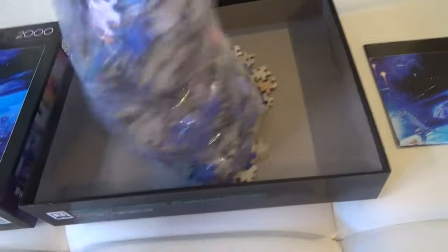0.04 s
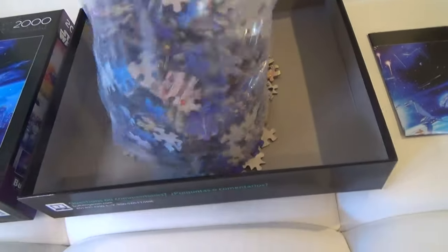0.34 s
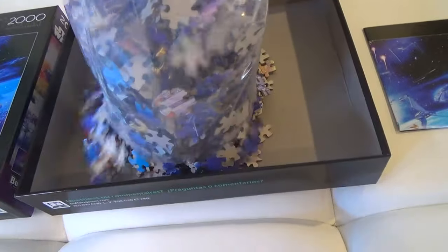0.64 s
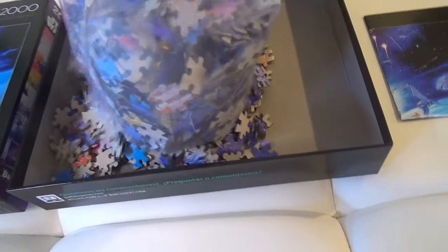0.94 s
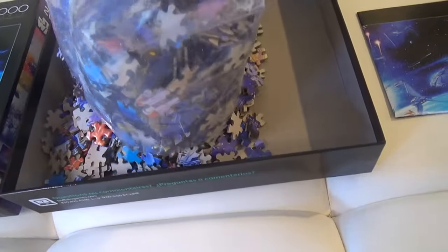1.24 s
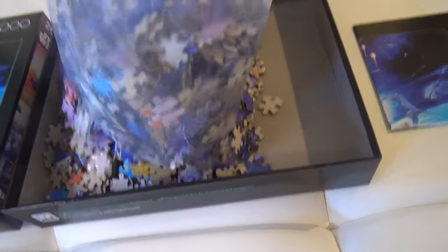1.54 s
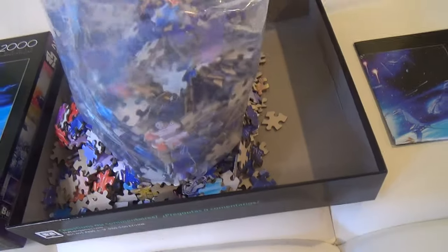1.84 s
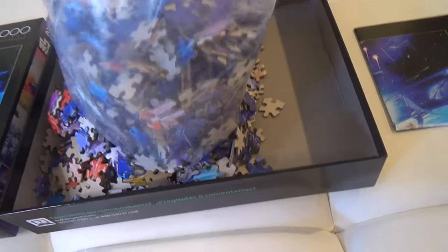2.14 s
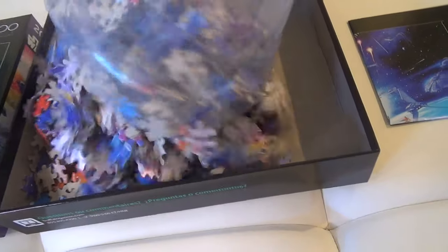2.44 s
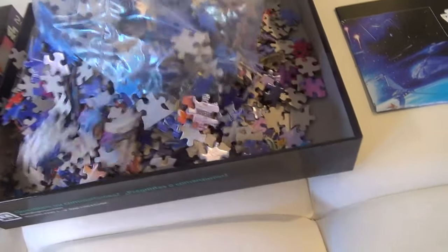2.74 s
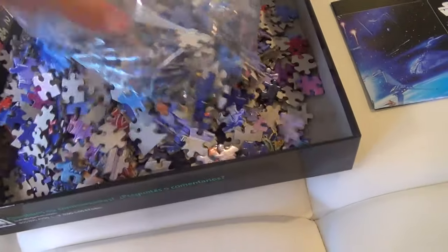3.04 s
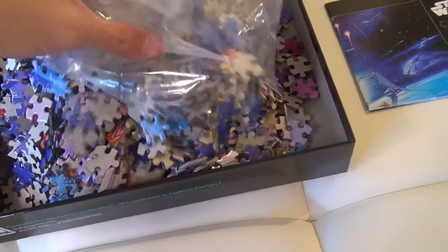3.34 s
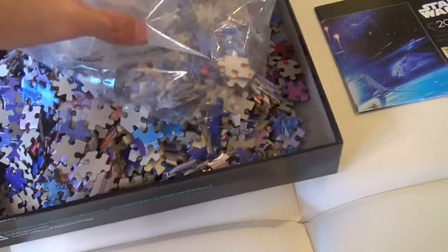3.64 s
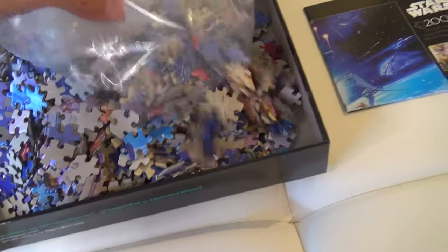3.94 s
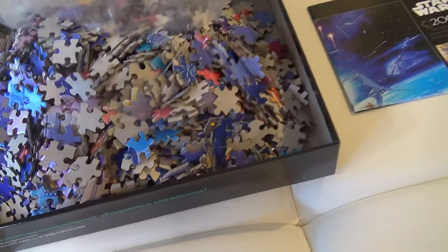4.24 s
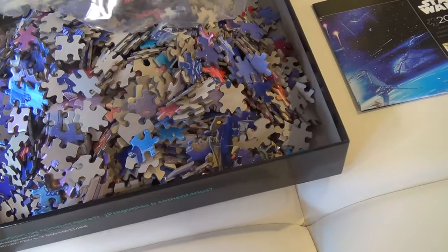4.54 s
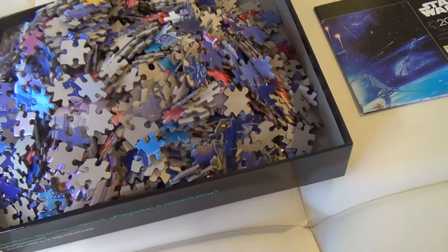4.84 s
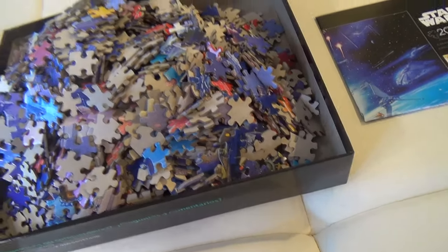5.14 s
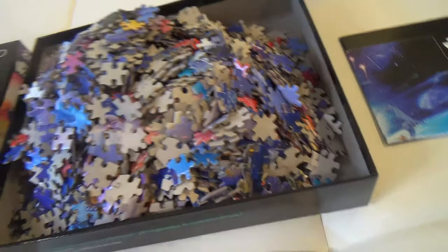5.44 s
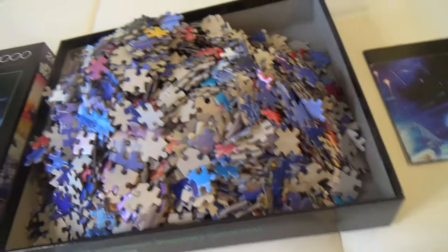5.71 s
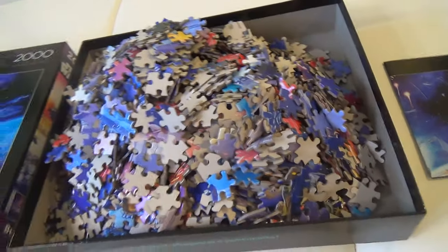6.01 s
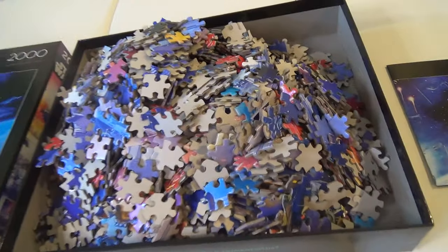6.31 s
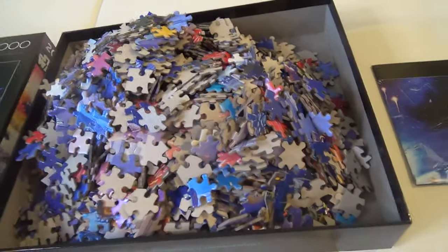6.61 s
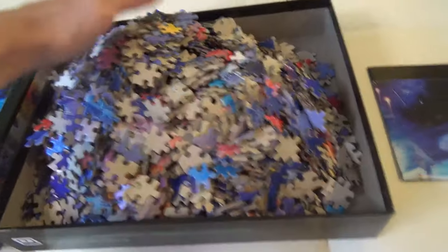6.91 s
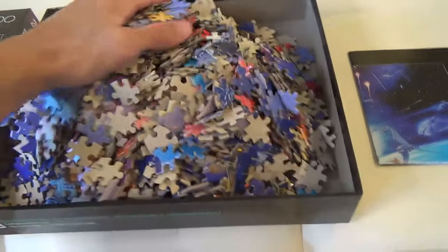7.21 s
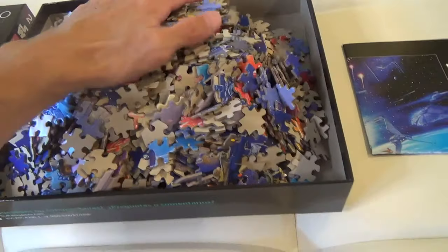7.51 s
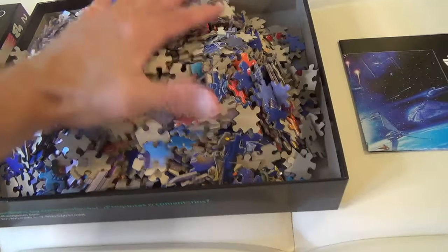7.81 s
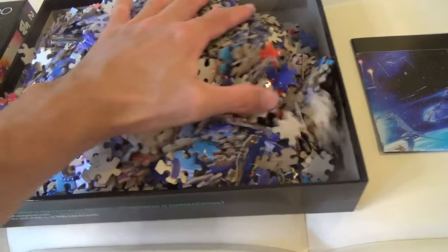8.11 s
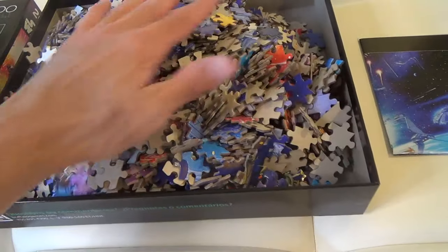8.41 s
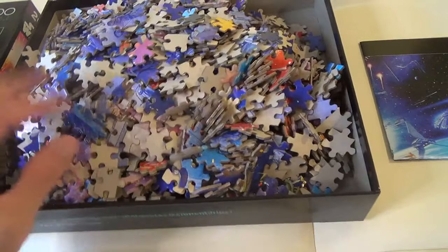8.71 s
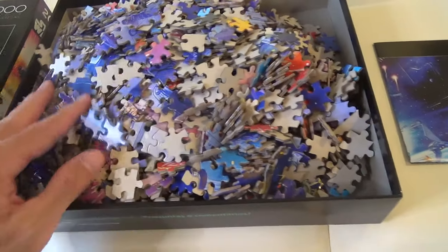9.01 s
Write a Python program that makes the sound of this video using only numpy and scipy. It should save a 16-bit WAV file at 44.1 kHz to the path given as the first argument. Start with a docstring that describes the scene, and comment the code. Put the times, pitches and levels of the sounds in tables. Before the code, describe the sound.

A plastic bag crinkles and snaps as cardboard puzzle pieces pour into a box in rattling surges, with a slightly hollow ring. After a last small spill, the empty bag rustles softly aside. Then a hand spreads the heap with quiet scrapes and dry clicks. The sounds are close and to the left, in a quiet room with a faint hum and fast electronic ticking.

```python
"""A plastic bag crinkles and cardboard puzzle pieces pour out of it into their box, close by on the left.
The bag's creases snap, each piece rings briefly as it lands, and the box adds a hollow note.
The emptied bag rustles as it is put aside; then a hand spreads the heap, and pieces scrape and click.
Under it all lie the hush of a small living room, a low hum and a faint, fast electronic ticking."""
import sys
import numpy as np
from scipy import signal
from scipy.fft import rfft, irfft, next_fast_len
from scipy.io import wavfile
from scipy.ndimage import uniform_filter1d

SR = 44100
rng = np.random.default_rng(int(sys.argv[2]) if len(sys.argv) > 2 else 0)


def persist_wave(psi):
    """Save psi, clipped to +-1, as 16-bit WAV."""
    counts = np.round(np.clip(psi, -1, 1) * 32767).astype(np.int16)
    wavfile.write(sys.argv[1], SR, np.atleast_2d(counts).T)


N = 408366

# The tone of the bag's plastic film. Each row: frequency in Hz, relative level in dB.
FILM_TONE = [(30, -14), (70, -4), (150, 1), (400, 2.5), (700, 4), (1200, 0), (2000, 5), (3200, 1),
             (5000, -4.5), (8000, -8.5), (11000, -12.5)]


def from_db(db):
    """Turn decibels into a factor to multiply a sound by."""
    return 10 ** (np.asarray(db) / 20)


def unit_level(sound):
    """Scale a sound to an average power of 1."""
    return sound / np.sqrt(np.mean(sound ** 2) + 1e-20)


def level_curve(rows):
    """Join rows of seconds and dB into a gain for every sample, silent outside the rows."""
    times_s, levels_db = np.transpose(rows)
    return from_db(np.interp(np.arange(N) / SR, times_s, levels_db, left=-120, right=-120))


def at_hz(rows, hz, column=1):
    """Read a table at any frequency, gliding between its rows."""
    rows = np.array(rows)
    return np.interp(np.log(np.maximum(hz, 1)), np.log(rows[:, 0]), rows[:, column])


def colour(sound, tone, size=2048):
    """Give a sound the tone in a table, with a filter that keeps the power of white noise."""
    gains = from_db(at_hz(tone, np.arange(size // 2 + 1) * SR / size))
    # folding the cepstrum makes the filter ring only after a click, never before it
    cepstrum = irfft(np.log(gains))
    cepstrum[1:size // 2] *= 2
    cepstrum[size // 2 + 1:] = 0
    response = irfft(np.exp(rfft(cepstrum)))
    return signal.oaconvolve(sound, response[None] / np.linalg.norm(response))[:, :N]


def band(sound, low_hz, high_hz):
    """Keep the part of a sound between two frequencies."""
    bandpass = signal.butter(2, [low_hz, min(high_hz, SR / 2 - 100)], "band", fs=SR, output="sos")
    return signal.sosfilt(bandpass, sound + 1e-18)


def drift(turns_per_s):
    """A random curve that wanders about 1 to either side of zero."""
    points = rng.standard_normal(N // 20)
    return np.interp(np.arange(N) * turns_per_s / SR, np.arange(len(points)), points)


def ring(clicks, hz, cycles):
    """Each click starts a pure tone that dies by 60 dB in so many cycles."""
    decay = np.exp(-np.log(1000) * hz / (cycles * SR))
    angle = 2 * np.pi * hz / SR
    return signal.lfilter([1, 0, -1], [2, -4 * decay * np.cos(angle), 2 * decay * decay], clicks + 1e-18)


def panned(pan_db):
    """Gains for the two ears, the left louder by pan_db."""
    return from_db(np.array([[.5], [-.5]]) * pan_db)


def add(out, start_s, sound):
    """Mix a short sound in at the given time."""
    start = max(round(start_s * SR), 0)
    out[:, start:start + sound.shape[1]] += sound[:, :N - start]


def gestures(rows, attack_s, fade_s):
    """Each movement swells, holds and dies away; movements that overlap add in power."""
    t = np.arange(0, N, 20) / SR
    power = 1e-12
    for start_s, hold_s, db in rows:
        swell = np.clip((t - start_s) / attack_s, 0, 1)
        fade = np.exp(-np.clip((t - start_s - hold_s) / fade_s, 0, 20))
        power = power + (from_db(db) * swell * fade) ** 2
    return np.interp(np.arange(N) / SR, t, np.sqrt(power))


def contacts(per_s, spread_db, pan_db, even_s):
    """Random stereo clicks of uneven size and place, their loudness evened out over even_s."""
    sizes = from_db(spread_db * np.minimum(rng.exponential(1, N), 4)) * rng.choice([-1, 1], N)
    clicks = sizes * (rng.random(N) < per_s / SR)
    width = max(int(even_s * SR), 2)
    power = uniform_filter1d(uniform_filter1d(clicks ** 2, width), width)
    return clicks / np.sqrt(np.abs(power) + 1e-4) * panned(pan_db * rng.standard_normal(N))


def tinted(clicks, tint_db, bands=14):
    """Every click is a scrap of its own shape: it gets its own strength and sign in each band."""
    hits = np.flatnonzero(clicks[0])
    edges_hz = np.linspace(np.sqrt(40), np.sqrt(12500), bands + 1) ** 2
    out = 0
    for low, high in zip(edges_hz, edges_hz[1:]):
        gain = np.zeros(N)
        gain[hits] = from_db(tint_db * rng.uniform(-1.9, 1, len(hits))) * rng.choice([-1, 1], len(hits))
        out = out + band(clicks * gain, low, high)
    return unit_level(out)


def crackle(tone, per_s, spread_db, hiss_db, tint_db):
    """Flurries of tiny snaps over a fine hiss of sliding."""
    clicks = contacts(per_s * from_db(4.5 * drift(60)), spread_db, pan_db=3.5, even_s=0.47)
    hiss_gain = from_db(hiss_db)
    mix = tinted(clicks, tint_db) + hiss_gain * rng.standard_normal(N)
    return unit_level(colour(mix / np.sqrt(1 + hiss_gain ** 2), tone))


def burst(decay_s, size=1300):
    """A chatter of tiny slips that swells in about a millisecond or less and fades quickly."""
    age = np.arange(size) / (decay_s * SR)
    chatter = rng.standard_normal(size) * np.sqrt(age) * np.exp(-age)
    return chatter / np.linalg.norm(chatter)


def room_air():
    """The quiet room's soft hush, mostly the same at both ears."""
    # The tone of the hush. Each row: frequency in Hz, relative level in dB.
    air_tone = [(25, -15), (55, -15), (115, -7.5), (178, -10.5), (250, -7.5), (444, -16.5), (907, -14),
                (2100, -24.5), (3000, -22.5), (4500, -27.5), (11000, -32)]
    noise = rng.standard_normal(N) + from_db(-7.5) * rng.standard_normal((2, N))
    return from_db(-60.5) * colour(noise, air_tone)


def hum():
    """A low hum whose tones waver a little in loudness and pitch."""
    # The tones of the hum. Each row: pitch in Hz, average level in dB.
    hum_tones = [(58, -71), (114, -72.5), (241, -70.5)]
    t = np.arange(N) / SR
    out = 0
    for hz, db in hum_tones:
        height = from_db(db + 2 * drift(3.2)) * np.sqrt(2)
        out = out + height * np.sin(2 * np.pi * hz * t + 0.6 * drift(12))
    return out


def electronic_ticking(per_s=30):
    """Faint, regular ticks of uneven strength, each ringing at two high pitches."""
    ticks_so_far = np.floor((np.arange(N) / SR + .003) * per_s)
    beat = (np.diff(ticks_so_far, prepend=0) > 0) * from_db(3 * drift(30))
    return from_db(-55.5) * (ring(beat, hz=2660, cycles=95) + from_db(-2) * ring(beat, hz=3050, cycles=50))


def room_echo(sound):
    """The room answers with a short wash of echoes, different at each ear."""
    # The room's echo. Each row: frequency in Hz, relative level in dB, seconds to fade by 60 dB.
    echo_bands = [(100, -9, 0.18), (400, -13, 0.35), (1450, -9, 0.1), (4000, -17.5, 0.051),
                  (10500, -6.5, 0.26)]
    t = np.arange(SR // 2) / SR
    edges_hz = np.geomspace(50, 13000, 9)
    tail = 0
    for low, high in zip(edges_hz, edges_hz[1:]):
        hz = np.sqrt(low * high)
        fade = np.exp(-np.log(1000) * t / at_hz(echo_bands, hz, column=2)) * (t > .004)
        echoes = band(rng.standard_normal((2, len(t))) * fade, low, high)
        tail = tail + echoes * from_db(at_hz(echo_bands, hz)) / np.linalg.norm(fade)
    return signal.oaconvolve(sound.mean(axis=0)[None], tail)[:, :N]


def box_ring(sound):
    """The box adds a hollow ring: each panel lifts the sound below its own note and thins it above."""
    # The notes of the box and its heap. Each row: pitch in Hz, width in Hz, strength in dB.
    box_notes = [(306, 44, -6.5), (700, 140, -16.5), (1090, 59, -9.5), (1760, 210, -12.5), (2250, 64, -7.5)]
    out = sound
    for hz, width_hz, db in box_notes:
        decay = np.exp(-np.pi * width_hz / SR)
        angle = 2 * np.pi * hz / SR
        drive = [0, 2 * (1 - decay) * np.sin(angle)]
        feedback = [1, -2 * decay * np.cos(angle), decay * decay]
        out = out + from_db(db) * signal.lfilter(drive, feedback, sound + 1e-18)
    return out


def bag_rustle(taut_hiss_db=-5.5, slack_hiss_db=1):
    """Tight film crackles under its load and at every tug; the slacker it is, the more it swishes."""
    # The film rustles under its load until empty. Each row: time in seconds, relative level in dB.
    load = [(0, -33), (0.55, -38), (0.85, -44), (1.8, -43.5), (2.5, -37.5), (3.9, -45), (4.5, -51.5),
            (4.8, -72), (5.4, -76)]
    # The full bag is shaken or tugged. Each row: start in seconds, hold in seconds, relative level in dB.
    tugs = [(0.0, 0.24, -35), (0.338, 0.008, -30.5), (0.41, 0.013, -33.5), (0.502, 0.081, -34.5),
            (0.65, 0.018, -34), (0.94, 0.067, -40.5), (1.42, 0.027, -41), (1.57, 0.047, -31.5),
            (1.9, 0.12, -34.5), (2.08, 0.14, -41), (2.39, 0.28, -33.5), (2.68, 0.14, -40.5),
            (2.89, 0.085, -39), (3.19, 0.059, -42), (3.465, 0.059, -37), (3.605, 0.13, -40),
            (3.81, 0.025, -34), (3.9, 0.044, -39.5)]
    # The empty bag is moved aside and sinks together. Each row: as for the tugs.
    swishes = [(5.485, 0.0088, -50), (5.524, 0.0097, -54), (5.735, 0.019, -51), (5.8, 0.071, -55.5),
               (5.953, 0.096, -47.5), (6.24, 0.11, -57), (6.405, 0.087, -43.5), (6.635, 0.019, -54.5),
               (6.713, 0.0078, -51)]
    taut = np.hypot(level_curve(load), gestures(tugs, attack_s=0.0005, fade_s=0.034))
    slack = gestures(swishes, attack_s=0.0026, fade_s=0.066)
    level = np.hypot(taut, slack)
    hiss_db = taut_hiss_db + (slack_hiss_db - taut_hiss_db) * slack / level
    return from_db(2.08) * level * crackle(FILM_TONE, per_s=520, spread_db=3.0, hiss_db=hiss_db, tint_db=7)


def crease_snaps(crack_delay_s=.0007):
    """A crease snaps: a crisp crack inside a few milliseconds of rustle. It also shakes the whole film."""
    # The loudest creases. Each row: start in seconds, relative level in dB, brightest frequency in Hz.
    creases = [(0.158, -22.5, 4920.0), (0.252, -24.5, 3600), (0.341, -23, 3250), (0.414, -27, 2980),
               (0.51, -21, 3570.0), (0.535, -27, 3300), (0.563, -21, 3160), (0.595, -23, 5400.0),
               (0.803, -23.5, 3230.0), (0.978, -22.5, 6124), (1.178, -28.5, 5335), (1.427, -21, 4760),
               (1.499, -21.5, 5040), (1.539, -19.5, 3000), (1.675, -21.5, 6120.0), (1.701, -27, 5700.0),
               (1.727, -26.5, 3660), (1.771, -32, 3940), (1.91, -22, 2900), (1.938, -25.5, 5980),
               (1.955, -19, 4060), (1.987, -22, 4430), (1.998, -24.5, 5000), (2.05, -18, 2670),
               (2.057, -20, 3790), (2.096, -22, 5150), (2.179, -24, 6120), (2.197, -20, 3934),
               (2.732, -18, 4410), (2.76, -22, 3960.0), (2.792, -23, 4270), (2.849, -21, 4860),
               (2.869, -20.5, 3400), (2.936, -21, 3750), (3.01, -24, 4590), (3.069, -20, 3170),
               (3.08, -23, 5790.0), (3.138, -22, 4600), (3.151, -26, 6360.0), (3.172, -23, 4900),
               (3.202, -22.0, 3750.0), (3.316, -23.5, 3830), (3.354, -23.5, 4300), (3.443, -23.5, 4250),
               (3.463, -25, 6370), (3.48, -25, 5200), (3.498, -22, 5800), (3.514, -25, 3500),
               (3.609, -24.5, 4200), (3.821, -24.5, 3370), (3.958, -28.5, 3200), (4.038, -28.5, 4455),
               (4.781, -42.5, 5500), (4.956, -34.5, 3560), (5.099, -50, 3000), (5.134, -44.5, 2940),
               (5.375, -51, 3800), (5.429, -36.5, 2600), (5.477, -41.5, 3500), (5.499, -45, 2800),
               (5.525, -28, 5430), (5.738, -33.5, 3940), (5.755, -46, 4500), (5.961, -27.5, 2700),
               (6.009, -38.5, 5500), (6.45, -34, 4000), (6.483, -36, 4900)]
    snaps, shakes = np.zeros((2, N)), np.zeros((2, N))
    for start_s, db, hz in creases:
        crack = np.roll(burst(decay_s=.00045), int(crack_delay_s * SR))
        rustle = from_db(-1) * burst(decay_s=0.0015)
        snap = (crack + rustle) * from_db(db + 16.5) * panned(rng.normal(0, 2.5))
        add(snaps, start_s, band(snap, hz / 2, hz * 2))
        add(shakes, start_s, snap)
    return snaps + from_db(-3.0) * colour(shakes, FILM_TONE)


def edge_ticks(edge_hz=8060):
    """The edge of one piece slips off another with a thin, bright tick."""
    # The slipping edges. Each row: start in seconds, relative level in dB.
    slips = [(4.331, -35), (4.375, -35), (4.409, -31), (4.507, -28), (7.231, -38.5), (7.386, -36),
             (7.534, -45), (7.896, -36), (8.047, -36), (8.079, -39), (8.134, -38), (8.325, -47)]
    out = np.zeros((2, N))
    for start_s, db in slips:
        slip = burst(decay_s=0.0024)
        tick = band(slip, edge_hz * 0.72, edge_hz * 1.01) + from_db(-4.0) * slip
        add(out, start_s, tick * from_db(db + 21) * panned(rng.normal(0, 3.9)))
    return out


def piece_taps(bounces=2, bounce_db=-10.5, turn_octaves=0.3, cushion_db_per_s=.4, size=2600):
    """A piece lands with a dry tap and settles; each weaker bounce catches another corner and pitch."""
    # Single pieces landing or flipping over. Each row: start in seconds, relative level in dB, pitch in Hz.
    landings = [(0.499, -13, 1420), (0.653, -16, 1400), (0.686, -12.5, 1940), (0.71, -15, 770),
                (0.729, -18, 990), (0.762, -12, 1630), (0.789, -18, 1440), (0.814, -16, 1450),
                (0.886, -12, 1260), (0.951, -13.5, 1100), (1.047, -18, 1800), (1.132, -16.5, 989),
                (1.191, -12, 1530), (1.242, -22.5, 1596), (1.38, -19, 1110), (1.469, -22.5, 1140),
                (1.55, -13, 1990), (1.795, -19.5, 2375), (2.016, -20, 1150), (2.243, -19.5, 1220),
                (2.343, -16, 891), (2.662, -21, 1050), (2.679, -17, 1500), (2.863, -20, 1007),
                (3.109, -21.5, 1276), (3.203, -25, 163), (3.318, -17.5, 1090), (3.794, -28, 1550),
                (3.812, -20, 1270), (3.941, -20, 1782), (4.334, -19, 1044), (4.36, -18.5, 952),
                (4.387, -16.5, 1720), (4.399, -18.5, 1592), (4.415, -18.5, 1190), (4.443, -16.5, 1350),
                (4.47, -17, 1730), (4.495, -15, 1118), (4.508, -15.5, 1130), (4.546, -21, 1200),
                (4.563, -27, 1300), (4.601, -30, 1123), (4.707, -44, 1760), (5.212, -44, 1500),
                (5.427, -34, 870), (5.437, -31, 1220), (5.48, -30, 687), (6.486, -23.5, 2020),
                (6.98, -24, 1400), (7.03, -25, 770), (7.055, -34, 1420), (7.193, -31.5, 1510),
                (7.2, -29.5, 1110), (7.883, -19.5, 1190), (7.9, -37, 1330), (7.911, -28, 1210),
                (7.974, -22.5, 1720), (8.026, -23, 1320), (8.047, -29, 1060), (8.086, -32, 554),
                (8.19, -35.5, 760), (8.445, -29.5, 1180), (8.462, -33, 1070), (8.493, -27.5, 1360),
                (8.998, -36.5, 700), (9.132, -32, 1280)]
    out = np.zeros((2, N))
    for start_s, db, hz in landings:
        delays_s = np.cumsum(np.r_[0, rng.uniform(.0015, .005, bounces)])
        pitches = hz * 2 ** (turn_octaves * np.r_[0, rng.uniform(-1, 1, bounces)])
        hits = [signal.unit_impulse(size, int(delay_s * SR)) * from_db(bounce_db * np.sqrt(k))
                for k, delay_s in enumerate(delays_s)]
        body = sum(ring(hit, pitch, cycles=8) for hit, pitch in zip(hits, pitches))
        body = band(body, hz / 1.55, hz * 1.55)   # soft cardboard blunts the attack
        grating = np.convolve(sum(hits), burst(decay_s=.0006))[:size]
        edge = band(grating, hz / 2.6, hz * 1.7)
        edge_db = 15 - cushion_db_per_s * start_s   # the growing, loosened heap cushions more and more
        tap = body + from_db(edge_db) * edge
        tap *= min(1, hz / 650)   # low taps ring longer, so they are played softer
        add(out, start_s, tap * from_db(db + 3.5) * panned(rng.normal(0, 1)))
    return out


def clatter(level, per_s, width, crowding, spread_db, contact_db, pitch_count):
    """Tumbling pieces ring briefly at pitches of their own; they come in clumps, more in a louder flow."""
    # How strongly pieces ring. Each row: pitch in Hz, relative level in dB.
    ring_tone = [(350, -1), (520, -2.5), (800, 6.5), (1150, 3), (1700, 6.5), (2300, 3), (3000, -1),
                 (3800, -24)]
    # Two pieces touch: a dull knock and a bright edge. Each row: frequency in Hz, relative level in dB.
    contact_tone = [(30, -22), (100, 6), (260, 4), (420, 7), (1000, 5), (3000, -7), (4900, -7), (7200, 1.5),
                    (9000, -7.5), (11000, -11)]
    # Pieces ring brightest at the height of the big slide, duller before and after.
    # Each row: time in seconds, dB added to the treble and taken from the bass.
    brightness = [(0.4, -4), (0.85, -4.5), (2.35, -2.5), (2.6, 2), (4.4, -3), (9.26, -6)]
    rate = per_s * (level / from_db(-30.5)) ** crowding * from_db(2 * drift(70))
    clicks = contacts(rate, spread_db, pan_db=0.5, even_s=0.024)
    chosen = rng.integers(0, pitch_count // 2, (2, N))   # each contact bends a piece in two ways
    rings = 0
    for k, hz in enumerate(np.geomspace(ring_tone[0][0], ring_tone[-1][0], pitch_count)):
        struck = chosen[k % 2] == k // 2
        note = band(clicks * struck, hz / (1 + width), hz * (1 + width))
        rings = rings + note * from_db(at_hz(ring_tone, hz))
    bass = signal.sosfiltfilt(signal.butter(1, 1300, fs=SR, output="sos"), rings)
    tilt = from_db(np.interp(np.arange(N) / SR, *np.transpose(brightness)))
    rings = unit_level(bass / tilt + (rings - bass) * tilt)
    knocks = colour(tinted(clicks, tint_db=-2.0), contact_tone)
    return level * (rings + from_db(contact_db) * knocks)


def spreading_hand():
    """Each stroke of the hand makes the pieces tumble and scrape together."""
    # Pushes through the heap. Each row: start in seconds, hold in seconds, relative level in dB.
    strokes = [(6.965, 0.014, -52.5), (7.13, 0.098, -54), (7.29, 0.098, -54), (7.5, 0.16, -63.5),
               (7.69, 0.07, -59.5), (7.79, 0.36, -53.5), (8.845, 0.19, -62), (9.08, 0.094, -61.5)]
    # Cardboard sliding on cardboard. Each row: frequency in Hz, relative level in dB.
    scrape_tone = [(40, -26), (130, 9), (260, 6.5), (420, 7.5), (800, 7), (2000, 2), (3200, 0), (4900, -5),
                   (7200, 2.5), (9000, -3.5), (11000, -7.5)]
    push = gestures(strokes, attack_s=0.0086, fade_s=0.08)
    tumble = clatter(push, per_s=1200, width=0.16, crowding=0.39,
                     spread_db=7.0, contact_db=-38, pitch_count=16)
    scrape = push * crackle(scrape_tone, per_s=900, spread_db=4.0, hiss_db=0.0, tint_db=1.0)
    return from_db(-3.5) * tumble + from_db(2.0) * scrape


def pouring_pieces(clump_hold_s=0.018):
    """Pieces fall from the bag into the box as a trickle, in slides and in sudden clumps."""
    # The steady trickle. Each row: time in seconds, relative level in dB.
    trickle = [(0, -39.5), (0.6, -34), (1.05, -35.5), (1.45, -46), (1.85, -49.5), (1.95, -38),
               (2.25, -42.5), (2.9, -40.5), (3.4, -47.5), (3.9, -44), (4.3, -51.5), (4.85, -74)]
    # The load gives way and slides out. Each row: start in seconds, hold in seconds, relative level in dB.
    slides = [(0.648, 0.19, -31.5), (0.879, 0.094, -28.5), (1.552, 0.087, -33.5), (2.281, 0.12, -31),
              (2.32, 0.3, -24.5), (4.385, 0.11, -35.5), (4.5, 0.1, -43)]
    # A clump lands all at once. Each row: start in seconds, relative level in dB.
    clumps = [(0.228, -28.5), (0.258, -23.5), (0.338, -27.5), (0.404, -23.5), (0.457, -27.5), (0.504, -26),
              (0.549, -23.5), (0.61, -27.5), (0.923, -24.5), (1.099, -34), (1.124, -34), (2.414, -25.5),
              (2.891, -34), (3.221, -33.5), (3.51, -36.5), (3.846, -38)]
    sliding = gestures(slides, attack_s=0.035, fade_s=0.055)
    held_clumps = [(start_s, clump_hold_s, db) for start_s, db in clumps]
    clumping = gestures(held_clumps, attack_s=0.0065, fade_s=0.013)
    flow = np.sqrt(level_curve(trickle) ** 2 + sliding ** 2 + clumping ** 2)
    return from_db(-4.5) * clatter(flow, per_s=750, width=0.086, crowding=.75,
                                   spread_db=2.0, contact_db=-13.5, pitch_count=32)


def scene():
    """Pieces and bag sound from the listener's left, in a quiet room."""
    # The box lies to the left. Each row: frequency in Hz, how much louder the left ear is in dB.
    left_lead = [(40, 3), (130, 4), (500, 7), (1000, 4), (2000, 3), (4000, 2), (11000, 0.5)]
    pieces = pouring_pieces() + spreading_hand() + piece_taps() + edge_ticks()
    bag = bag_rustle() + crease_snaps()
    direct = box_ring(pieces + bag)
    size = next_fast_len(N + SR // 10)
    balance = panned(at_hz(left_lead, np.arange(size // 2 + 1) * SR / size))
    placed = irfft(rfft(direct + room_echo(direct), size) * balance, size)[:, :N]
    return placed + room_air() + hum() + electronic_ticking()


def record(dry):
    """The loudest peaks are rounded off and the highest treble is cut steeply."""
    ceiling, cutoff_hz = .37, 11150
    rounded = dry / (1 + (dry / ceiling) ** 4) ** .25
    return signal.sosfilt(signal.ellip(12, .2, 75, cutoff_hz, fs=SR, output="sos"), rounded)


dry = scene()
out = record(dry)
persist_wave(out)
```